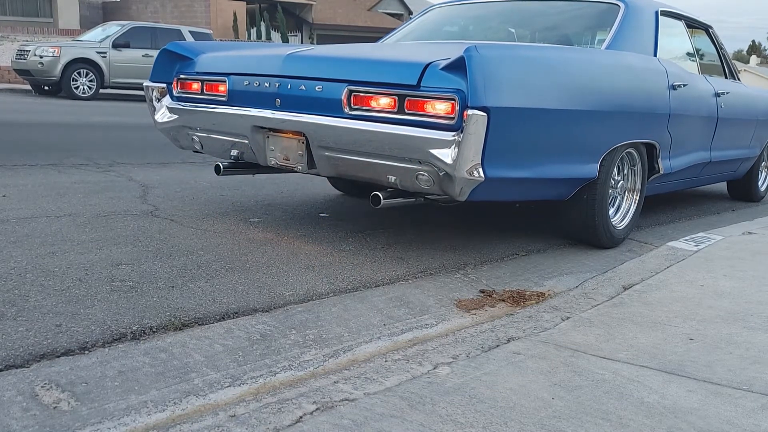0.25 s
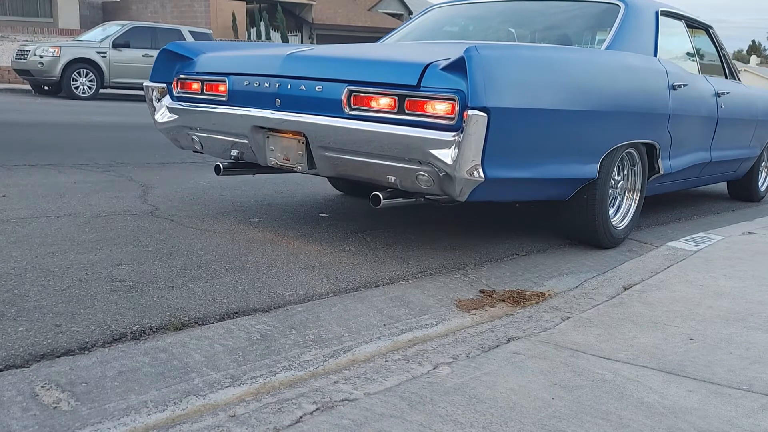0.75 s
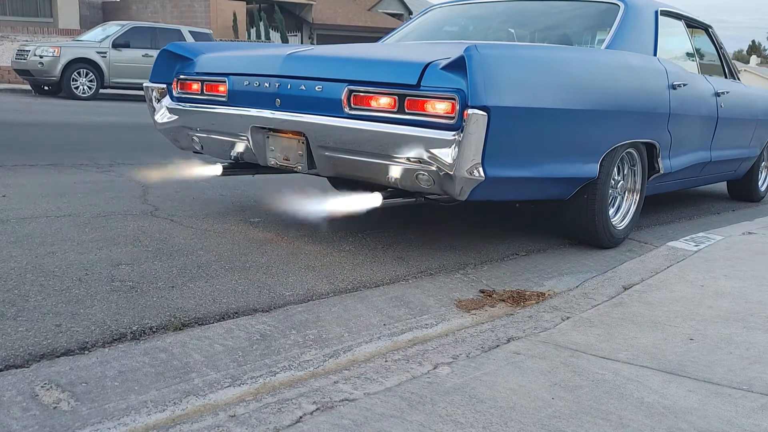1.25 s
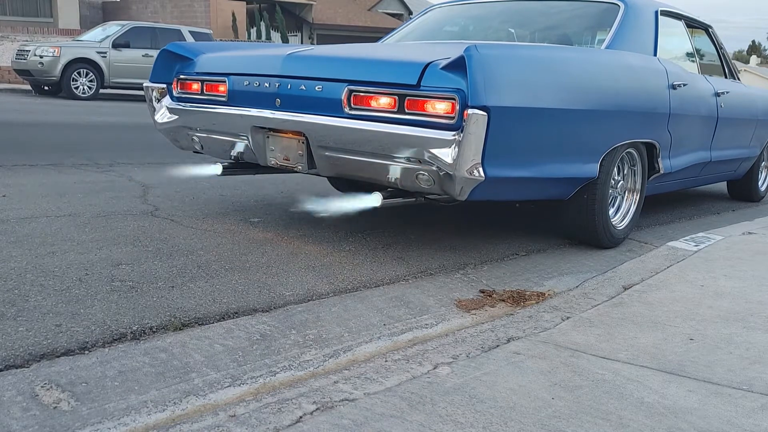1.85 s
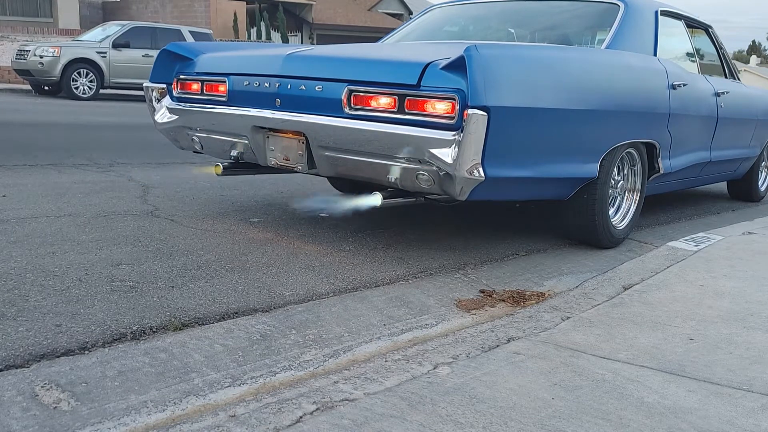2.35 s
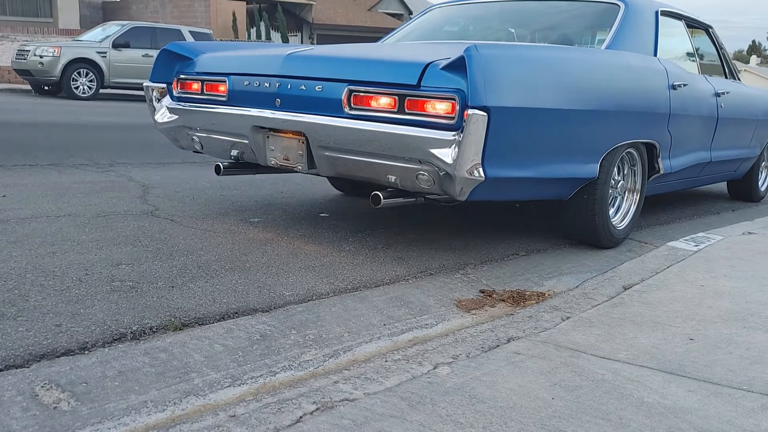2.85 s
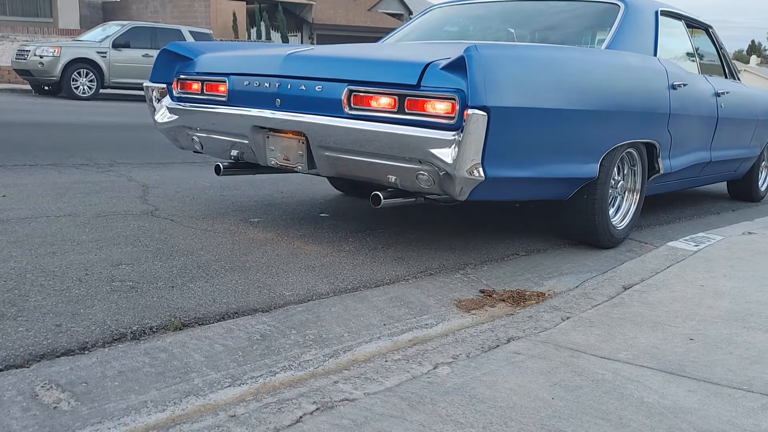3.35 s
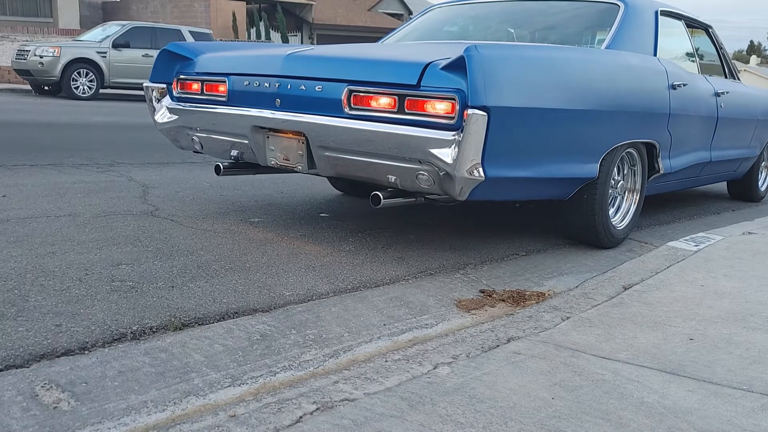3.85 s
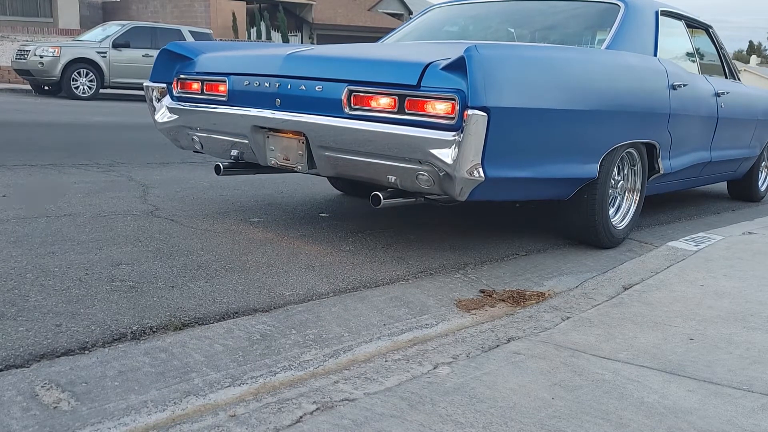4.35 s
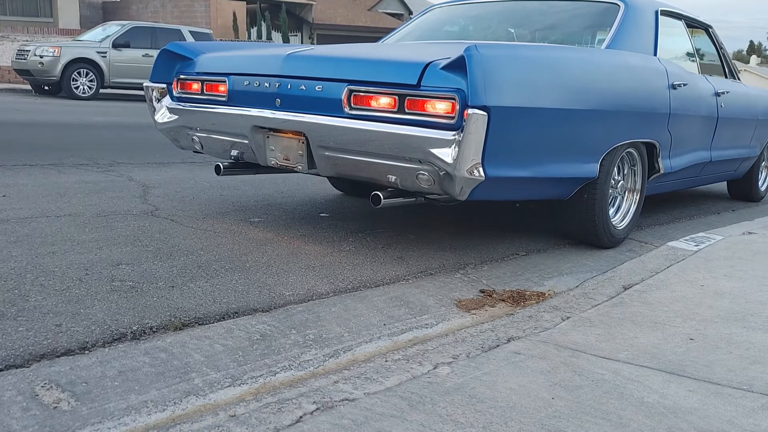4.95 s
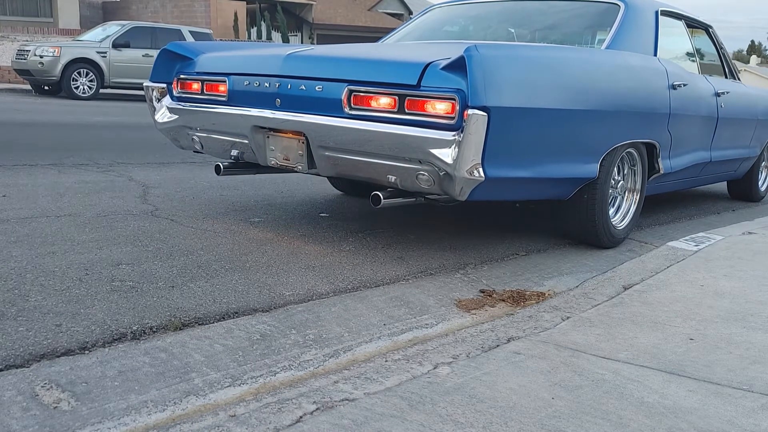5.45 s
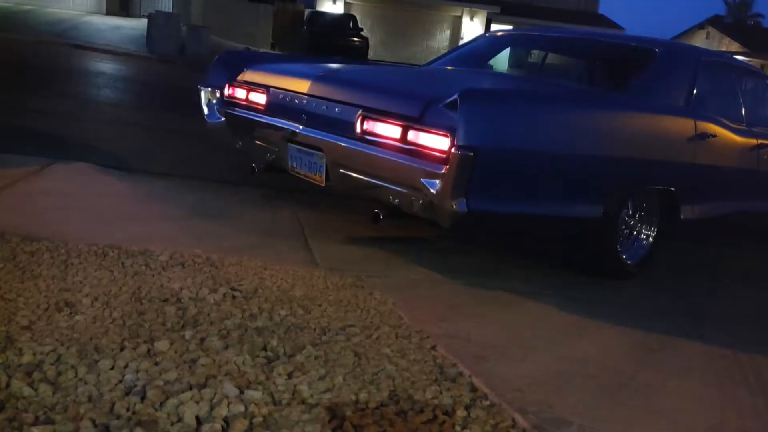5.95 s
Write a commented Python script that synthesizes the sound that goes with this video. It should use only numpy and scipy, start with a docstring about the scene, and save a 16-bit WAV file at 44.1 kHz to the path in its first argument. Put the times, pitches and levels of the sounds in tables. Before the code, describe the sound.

A V8 car engine runs throughout, thumping deeply and unevenly through open twin tailpipes about two metres from a low microphone on a quiet street. In the first second it gives four quick throttle stabs, each with a bark and a hissing rasp. From about 1.1 to 2.9 seconds the throttle is shut and fuel ignites in the pipes: a rapid, irregular string of pops and thuds over a low flame roar. Short revs return between 2.9 and 3.5 seconds. After a brief lull, a longer, crackling rev starts at 3.9, followed by two blips up to 4.7. The engine settles to a throbbing note, then is stabbed again at 5.2 and 5.5. At 5.6 the sound drops out for a tenth of a second, returning with a small blip and a final rev around 6. Faint valve ticking, slight wind and a short dull echo lie underneath.

```python
"""A V8 with open twin tailpipes, blipped at the kerb of a quiet street, two metres from a phone held low.
Uneven firings thump through the pipes and the escaping gas rasps when the throttle opens; on the overrun
unburnt fuel pops in flames. Behind that, loose tappets tick, the house fronts return a short dull tail
and a light wind touches the microphones. Near the end the sound drops out briefly and fades back in."""
import sys
import numpy as np
from scipy import signal
from scipy.fft import rfft, irfft
from scipy.io import wavfile

SR = 44100
rng = np.random.default_rng(int(sys.argv[2]) if len(sys.argv) > 2 else 0)


def master(y):
    """Save y as 16-bit WAV."""
    cut = np.clip(np.atleast_2d(y).T, -1, 1)
    pcm = np.round(cut * 32767)  # scale
    wavfile.write(sys.argv[1], SR, pcm.astype(np.int16))


N = 273420
TIME = np.arange(N) / SR

# Engine speed. Each row: time in seconds, firing rate in Hz, level of the firing note in dB.
ENGINE_SPEED = [(0.0, 112.5, -20), (0.171, 97.4, -30), (0.302, 117.8, -32), (0.399, 104.7, -28),
                (0.522, 126.7, -23), (0.7, 119.5, -27), (0.85, 112, -36), (1.05, 101.9, -32),
                (1.301, 127.2, -44), (1.86, 91.6, -17), (2.43, 74.84, -26), (2.68, 78.14, -42),
                (2.93, 104.9, -26), (3.03, 119.9, -11), (3.201, 100, -40), (3.321, 120.5, -30),
                (3.6, 105, -36), (3.75, 92.37, -11.5), (3.87, 68.47, -23), (4.06, 77.95, -25),
                (4.2, 125.5, -13), (4.3, 113, -17), (4.422, 125.7, -13), (4.548, 115, -15),
                (4.66, 127.9, -11.5), (4.85, 106.2, -9), (5.03, 86.05, -14), (5.19, 69.94, -30),
                (5.36, 117.9, -26), (5.461, 95.5, -9.5), (5.6, 115, -7), (5.751, 114.4, -14.5),
                (5.931, 82.02, -15), (6.2, 118, -30)]
# Strength in dB of each of the eight cylinders: the banks share the two pipes unevenly.
CYLINDER_DB = [-0.5, 1, 1.5, -5, -3.5, -2.5, -4.5, -2.5]
# Stabs of the throttle. Each row: start, hold and decay in seconds, opening from 0 to 1,
# extra thump, rasp and sizzle in dB.
THROTTLE_BLIPS = [(0.0, .1, 0.046, 0.66, -4.5, 2.5, 2.5), (0.14, 0.15, 0.066, 0.99, -0.5, 2.5, 3),
                  (0.399, 0.095, 0.058, 1, -4, 3, 3.5), (0.635, 0.22, 0.15, 0.97, -3.5, 5, 8.5),
                  (2.939, 0.11, 0.042, 0.8, 2, -2, -4), (3.1, 0.069, 0.049, 0.62, -4, 1, 0),
                  (3.19, 0.094, 0.075, 0.96, 1.5, 0, -2.5), (3.448, 0.0078, 0.055, 0.78, 0.5, 6.5, -8),
                  (3.871, .3, 0.19, 0.87, 1.5, 0, -1.5), (4.28, 0.13, 0.032, 0.96, 0.5, 2, 3),
                  (4.553, 0.079, 0.051, 0.93, 2, 0, 1.5), (5.197, .13, 0.077, 1, 4, 0, 1),
                  (5.459, 0.12, 0.044, 0.98, 0.5, -1.5, 0), (5.749, 0.057, 0.049, 0.51, -1.5, 5, -3),
                  (5.945, 0.31, 0.041, 0.98, 1, 3, 4)]
# Unburnt fuel burning in the pipes. Each row: time in seconds, richness from 0 to 1.
FLAME_RICHNESS = [(0.0, 0.06), (0.6, 0.57), (0.95, 0.67), (1.08, 0.73), (1.13, 1.0), (1.33, 0.9),
                  (1.45, 0.75), (1.8, 0.81), (2.0, 0.58), (2.3, 0.58), (2.6, 0.59), (2.74, 0.84),
                  (2.93, 0.77), (3.15, 0.16), (3.45, 0.02), (4.45, 0.47), (4.8, 0.47), (5.4, 0.28),
                  (6.2, 0.39)]
# Throttle shut and open, flame lean and rich. Each lists, from bass to treble, the relative level
# in dB of six bands: boom, thump, bark, rasp, crack, sizzle.
SHUT_DB = [-24.5, -21, -41, -57.5, -53, -69]
OPEN_DB = [-17, -18.5, -18, -28, -28, -42]
LEAN_DB = [-51, -48.5, -45.5, -62, -66, -89]
RICH_DB = [-18, -13, -15.5, -27, -35.5, -44]
# Tone of the pipes and of the escaping gas. Each row: frequency in Hz, relative level in dB.
PIPE_SPECTRUM = [(18, -36), (30, -30.5), (88, -12), (113, -1), (145, -6), (199, -6), (226, -9), (300, -8),
                 (459, -10.5), (497, -10), (538, -11), (573, -11), (660, -15), (994, -26), (1300, -26.5),
                 (1690, -83), (2860, -120)]
GAS_SPECTRUM = [(530, -31), (900, -4), (1800, -6.5), (2240, -6), (3110, -10), (4330, -7), (5390, -10.5),
                (6080, -7.5), (7950, -17.5), (9090, -6.5), (14400, -9.5), (15900, -19.5), (16500, -58)]
# The gas at the microphones. For rasp, crack and sizzle: left-right correlation; left minus right in dB.
GAS_CORRELATION = [0.6, 0.19, -0.021]
GAS_PAN_DB = [-1, -1.5, 3]
# Fuel lighting in the tailpipes. Each row: time in seconds, rasp and thud in relative dB, ring in Hz.
FUEL_POPS = [(1.0697, -43, -3, 243), (1.096, -45, -8, 240), (1.119, -16.5, -2, 241.9),
             (1.1858, -13, -3, 240.8), (1.2045, -15.5, -3, 403), (1.2381, -14, 0, 525.1),
             (1.267, -21, -2.5, 542.2), (1.2898, -10.5, -5, 266), (1.3472, -18, -2.5, 238),
             (1.3715, -38, -12, 262), (1.4368, -23.5, -3, 275), (1.4645, -20.5, -20, 243.4),
             (1.495, -25, -6, 299), (1.5237, -15, -6, 366), (1.5612, -18.5, -1.5, 259.5),
             (1.627, -20.5, -2.5, 295.5), (1.6567, -16.5, -4, 244), (1.6846, -21, -2, 390),
             (1.7338, -12, -9, 547), (1.772, -15.5, -20, 250), (1.8153, -13, -6.5, 366),
             (1.8601, -23, -9, 446), (1.8945, -23, -8, 323), (1.932, -17, -2, 376),
             (1.9745, -23.5, -2.5, 407), (1.9944, -21, -15, 250), (2.0378, -30, -15, 273),
             (2.0705, -26, -4, 238), (2.0964, -19.5, -12, 325), (2.1777, -17.5, -2.5, 296.2),
             (2.214, -17, -13, 323), (2.2595, -23.5, -13, 424), (2.3082, -21, -11, 535),
             (2.3503, -15.5, -4.5, 440), (2.4029, -22, -9, 279.4), (2.4552, -25, -16, 362),
             (2.5096, -15.5, -7.5, 358.7), (2.6228, -8.5, -4, 303), (2.672, -22, -15, 344),
             (2.7082, -15.5, -4, 369), (2.7292, -14, -5, 255), (2.7565, -14, -5, 244.1),
             (2.7767, -42, -9, 293), (2.816, -9, -1.5, 436.5), (2.8338, -36.5, -4, 439.5),
             (2.85, -21, -8, 394), (2.8725, -11, -2, 436), (2.889, -17, -21, 430)]
# The hardest firings. Each row: time in seconds, rasp and thud in relative dB,
# crack in dB above the rasp, ring in Hz.
HARD_FIRINGS = [(0.046, -28, -12, 8.5, 241), (0.0869, -21.5, -29, 4.5, 390),
                (0.1394, -25.5, -17, 13.5, 245), (0.1486, -14, -10, -12, 291), (0.1834, -5, -35, -9, 452),
                (0.2325, -5, -4, -4, 507), (0.3027, -48, -12, -9, 320), (0.401, -10, -4, -12.5, 244),
                (0.4152, -28, -8, 3, 286), (0.4433, -5.5, -7, -4.5, 242), (0.4776, -21, -2.5, 0, 224),
                (0.496, -24, -9, -15, 455), (0.635, -18.5, -32, 4, 312), (0.6948, -10.5, -3, -3.5, 253),
                (0.7475, -12.5, -13, -2, 396), (0.8075, -22, -37, -3, 372), (0.8223, -7.5, -5, -13, 240),
                (0.865, -19, -10, 5, 315), (2.9372, -12, -18, -22, 273.8), (2.9672, -8, -6, -15, 455),
                (3.0105, -7, -36, -7, 320), (3.032, -15, -9, 3, 372.7), (3.0438, -12, -7, -13, 377),
                (3.102, -27.5, -20, 10, 260), (3.1544, -23, -14, 5, 285), (3.1925, -12, -9, 1.5, 258),
                (3.2197, -8, -10, -3, 390), (3.2495, -24.5, -18, 6, 242), (3.2813, -26, -24, -3, 250.6),
                (3.3748, -23.5, -28, -6, 298.5), (3.4499, -15, -6.5, -0.5, 304),
                (3.7717, -28.5, -43, 1.5, 275), (3.8198, -26.5, -25, -8, 265), (3.8847, -9.5, -7, 3.5, 420),
                (3.905, -15, -10, -7, 242), (3.9175, -15, -23, -3, 263), (3.931, -8, -11, 2, 304),
                (3.9474, -24, -15, 6, 302), (3.9604, -21, -12, 12.5, 278), (3.9908, -12, -18, 1.5, 429.7),
                (4.0045, -27, -13, 13, 240), (4.0192, -31, -15, 2, 282), (4.0453, -11.5, -11.5, 2, 253),
                (4.0609, -11.5, -13, -1, 345), (4.0885, -14, -16, 5, 328.3), (4.0987, -13, -10, 2, 484),
                (4.11, -13, -17, -2, 256), (4.131, -11.5, -12, -6, 273.8), (4.1436, -12, -6, -1.5, 382),
                (4.1952, -16.5, -27, 5, 245.8), (4.2785, -25, -12, 4, 248.7), (4.3092, -11, -28, -13, 260),
                (4.3541, -14.5, -14, 1, 317), (4.4208, -17, -15, -4, 285), (4.5552, -13, -11, -12, 303),
                (4.581, -16, -8, 2, 322.7), (4.6371, -11.5, -17, -5, 250.6),
                (5.1991, -16.5, -10.5, -3, 312), (5.2248, -18.5, -10, 11, 472.6),
                (5.2375, -9.5, -23, 0.5, 325.6), (5.3141, -17.5, -22, 1, 253.1),
                (5.3773, -24.5, -18, -2, 244), (5.464, -29, -21, 8, 246.2), (5.4838, -9, -8, 0, 302),
                (5.5595, -24, -5, 0, 320.4), (5.7507, -26.5, -18, -14, 304), (5.7866, -15.5, -7, -9.5, 285),
                (5.9437, -16.5, -13.5, -18, 242), (5.9526, -30, -7, -4, 292), (5.9704, -20, -16, -1, 240.1),
                (5.9817, -40, -15.5, 2, 277.8), (5.9984, -23, -10, 1, 280), (6.0244, -15, -17, 0, 242),
                (6.0376, -30, -5.5, -3, 270), (6.0593, -28, -8, 1, 404), (6.0814, -13, -7, -7, 415.4),
                (6.0955, -22, -10, -3, 319.4)]
# Ring of the valve gear. Each row: frequency in Hz, relative level in dB, seconds to fall by 60 dB.
VALVE_MODES = [(2640, -1.5, 0.031), (4030, 1.5, .015), (6549, 4, 0.016)]
# Overall level, with a brief dropout near the end. Each row: time in seconds, gain in dB.
OVERALL_GAIN = [(5.595, -11), (5.608, -19), (5.61, -26), (5.63, -56), (5.67, -91), (5.685, -28), (5.7, -16),
                (5.72, -9)]

BOOM_TOP_HZ, THUMP_TOP_HZ, BARK_TOP_HZ, RASP_TOP_HZ, CRACK_TOP_HZ = 138, 375, 1050, 3300, 7800


def firings(rate_hz, jitter_s, scatter_db):
    """The cylinders fire in turn, each a little off: times, strengths in dB and the running cycle count."""
    cycles = np.cumsum(rate_hz) / SR
    count = np.arange(int(cycles[-1]))
    timing, strength = rng.standard_normal((len(count), 2)).T
    firing_s = np.interp(count, cycles, TIME) + jitter_s * timing
    firing_db = np.array(CYLINDER_DB)[count % 8] + scatter_db * strength
    return firing_s, np.minimum(firing_db, 2.5), cycles


def throttle_and_flame():
    """Six band levels in dB: the throttle moves them from shut to open, the flame adds its own roar."""
    opening, extra_db = np.zeros(N), np.zeros((6, N))
    for start, hold, decay, size, thump, rasp, sizzle in THROTTLE_BLIPS:
        age = np.maximum(TIME - start, 0)
        attack = (TIME >= start) * (1 - 0.04 * np.exp(-age / .03))  # nearly all of it comes at once
        blip = attack * np.exp(-np.maximum(age - hold, 0) / decay)
        opening = np.maximum(opening, size * blip)
        extra_db += np.outer([thump, thump, 0, rasp, 0, sizzle], blip)
    engine_db = blend(SHUT_DB, OPEN_DB, opening) + extra_db
    flame_db = blend(LEAN_DB, RICH_DB, curve(FLAME_RICHNESS))
    return 10 * np.log10(undb(2 * engine_db) + undb(2 * flame_db))  # the powers add


def tailpipes(firing_s, firing_db, boom_db, thump_db, bark_db, brightness_db):
    """Each firing is a pressure pulse with turbulent flow behind it, more with an open throttle."""
    pulses = impulses(firing_s, undb(firing_db))
    flow = unit(fade(pulses, 0.0073) * rng.standard_normal(N))
    exhaust = np.clip((brightness_db + 40) / 18, .4, .9) * flow + unit(pulses)
    boom = unit(colour(flow, PIPE_SPECTRUM, 15, BOOM_TOP_HZ))
    thump = unit(colour(exhaust, PIPE_SPECTRUM, BOOM_TOP_HZ, THUMP_TOP_HZ))
    bark = unit(colour(exhaust, PIPE_SPECTRUM, THUMP_TOP_HZ, BARK_TOP_HZ))
    return undb(boom_db + 9.5) * boom + undb(thump_db + 8.5) * thump + undb(bark_db + 9.5) * bark


def bangs(pop_crack_db=-18.5):
    """Fuel pops and hard firings together; the dull ones are flames, which linger."""
    pops = np.insert(FUEL_POPS, 3, pop_crack_db, axis=1)
    bang_s, rasp_db, thud_db, crack_above_db, ring_hz = np.vstack([pops, HARD_FIRINGS]).T
    linger = np.clip(-crack_above_db / 14, 0, 1)
    return bang_s, rasp_db, rasp_db + crack_above_db, thud_db, ring_hz, linger


def escaping_gas(firing_s, firing_db, band_db, brightness_db):
    """Rasp, crack and sizzle at the pipe mouths: in bursts with the throttle open, steadier when shut."""
    bang_s, rasp_db, crack_db, _, _, linger = bangs()
    sizzle_db = crack_db + np.interp(bang_s, TIME, band_db[2] - band_db[1])
    bang_db = [rasp_db - 4.5, crack_db + 1.5, sizzle_db + 4.5]
    burstiness = np.clip((brightness_db + 35) / 16, .25, 1)
    tint_db = 4.6 * rng.standard_normal((len(firing_s), 3)).T  # every burst has its own colour
    edges_hz = [BARK_TOP_HZ, RASP_TOP_HZ, CRACK_TOP_HZ, .45 * SR]
    left_right = np.array([[1], [-1]])
    out = np.zeros((2, N))
    for k, trim_db in enumerate([2.5, 4.0, 6.0]):
        bursts = unit(puff(impulses(firing_s, undb(0.26 * firing_db + tint_db[k])), 0.0019))
        flow = burstiness * bursts + 1 - 0.48 * burstiness
        shots = puff(impulses(bang_s, undb(bang_db[k])), 0.0012)
        flames = puff(impulses(bang_s, undb(bang_db[k]) * linger), 0.0038)
        envelope = undb(band_db[k] + trim_db) * flow + shots + .5 * flames
        noises = rng.standard_normal((2, N))
        band = GAS_SPECTRUM, edges_hz[k], edges_hz[k + 1]
        noise_rms = np.std(colour(noises[0], *band))
        mid, side = (colour(envelope * noise, *band) / noise_rms for noise in noises)
        pair = mid * np.sqrt(1 + GAS_CORRELATION[k]) + side * np.sqrt(1 - GAS_CORRELATION[k]) * left_right
        out += pair * undb(GAS_PAN_DB[k] / 2 * left_right)
    return out


def thuds(crest_db=10, burn_db=-11):
    """Each bang rings the gas column for a few cycles; flames leave a short roar of burning gas."""
    bang_s, _, _, thud_db, ring_hz, linger = bangs()
    peaks = undb(thud_db + crest_db)
    t = np.arange(2048) / SR
    rings = np.zeros(N + len(t))
    for at, peak, hz in zip(bang_s, peaks, ring_hz):
        ring = np.sin(2 * np.pi * hz * t) * (hz * t) ** 0.84 * np.exp(-hz * t / 0.78)
        start = int(max(at - 0.35 / hz, 0) * SR)
        rings[start:start + len(t)] += peak * ring / np.abs(ring).max()
    burn = puff(impulses(bang_s, peaks * undb(burn_db) * linger), 0.0046)
    roar = unit(colour(rng.standard_normal(N), PIPE_SPECTRUM, 220, BARK_TOP_HZ))
    return rings[:N] + burn * roar


def tappets(firing_s, level_db=-33.5, scatter_db=7):
    """Two loose tappets tick once in every round of the eight cylinders, over the rustle of the rest."""
    tick_s = np.sort(np.append(firing_s[3::8], firing_s[5::8]))
    ticks = impulses(tick_s, undb(level_db + scatter_db * rng.standard_normal(len(tick_s))))
    clatter = (fade(ticks, 0.00094) + undb(level_db - 14)) * rng.standard_normal((2, N))
    t = np.arange(2048) / SR
    ring = sum(undb(db - 60 * t / t60) * np.sin(2 * np.pi * hz * t) for hz, db, t60 in VALVE_MODES)
    return signal.fftconvolve(clatter, ring[None] / np.sqrt(np.sum(ring ** 2)), axes=1)[:, :N]


def street(x, t60_s, band_hz):
    """Asphalt, kerb and house fronts scatter a short dull tail, different on each side."""
    t = np.arange(SR // 4) / SR
    tail = rng.standard_normal((2, len(t))) * undb(-60 * t / t60_s)
    tail = signal.sosfilt(bandpass(*band_hz), tail)
    return signal.fftconvolve(x[None], tail / np.sqrt(np.sum(tail ** 2) / 2), axes=1)[:, :N]


def breeze():
    """A light wind buffets each microphone port on its own."""
    return undb(-48) * unit(signal.sosfilt(bandpass(20, 70), rng.standard_normal((2, N))))


def undb(db):
    """Decibels to amplitude."""
    return 10 ** (np.asarray(db) / 20)


def unit(x):
    """Scale to rms 1."""
    return x / np.sqrt(np.mean(x ** 2))


def curve(points):
    """Join rows of time and value with straight lines."""
    return np.interp(TIME, *np.transpose(points))


def blend(from_db, to_db, share):
    """Move each band between two levels as the share goes from 0 to 1."""
    return np.array(from_db)[:, None] + np.subtract(to_db, from_db)[:, None] * share


def bandpass(lo_hz, hi_hz):
    """A band filter with gentle slopes."""
    return signal.butter(2, [lo_hz, hi_hz], "band", fs=SR, output="sos")


def colour(x, spectrum, lo_hz, hi_hz):
    """Causal filter with the given spectrum; one band is then taken without delay, so bands add up."""
    hz, db = np.transpose(spectrum)
    grid_hz = np.linspace(1, SR / 2, 4097)
    cepstrum = irfft(np.log(undb(np.interp(np.log(grid_hz), np.log(hz), db))))
    cepstrum[1:4096] *= 2  # fold to minimum phase
    cepstrum[4097:] = 0
    response = irfft(np.exp(rfft(cepstrum)))[:4096]
    return signal.sosfiltfilt(bandpass(lo_hz, hi_hz), signal.fftconvolve(x, response)[:N])


def impulses(seconds, size):
    """Impulses of the given sizes at the given times."""
    x = np.zeros(N)
    np.add.at(x, np.clip((seconds * SR).astype(int), 0, N - 1), size)
    return x


def fade(x, seconds):
    """Every impulse becomes a sudden rise with an exponential fall."""
    return signal.lfilter([1], [1, -np.exp(-1 / (seconds * SR))], x)


def puff(x, seconds):
    """Every impulse becomes a rounded swell and a slower fall, peak near 1."""
    return fade(fade(x, seconds), 0.69 * seconds) * 3.79 / (seconds * SR)


def scene():
    """The car from two metres, with the street and the breeze around it; all of it drops out briefly."""
    crank_s, rate_hz, note_db = np.transpose(ENGINE_SPEED)
    rate_hz, note_db = np.interp(TIME, crank_s, rate_hz), np.interp(TIME, crank_s, note_db)
    firing_s, firing_db, cycles = firings(rate_hz, jitter_s=0.00117, scatter_db=6.0)
    note = np.sqrt(2) * undb(note_db) * np.sin(2 * np.pi * (cycles + 0.054))
    boom_db, thump_db, bark_db, rasp_db, crack_db, sizzle_db = throttle_and_flame()
    boom_db -= .7 * np.maximum(note_db + 20, 0)  # even firing gathers the boom into one note
    low = tailpipes(firing_s, firing_db, boom_db, thump_db, bark_db, rasp_db - thump_db) + note + thuds()
    high = escaping_gas(firing_s, firing_db, [rasp_db, crack_db, sizzle_db], crack_db - thump_db)
    tail = undb(-21) * street(low, t60_s=.2, band_hz=(120, 1100))
    tail += undb(-14) * street(high.mean(axis=0), t60_s=0.082, band_hz=(680, 2950))
    return (low + high + tail + tappets(firing_s) + breeze()) * undb(curve(OVERALL_GAIN))


def record(dry):
    """The phone drops the deepest bass, flattens the peaks under a ceiling and cuts the top."""
    bottom_hz, top_hz, ceiling = 30, 15900, .9
    firm = signal.sosfilt(signal.butter(2, bottom_hz, "high", fs=SR, output="sos"), dry)
    capped = firm / (1 + (firm / ceiling) ** 4) ** (1 / 4)
    return signal.sosfilt(signal.ellip(8, .2, 70, top_hz, fs=SR, output="sos"), capped)


dry = scene()
out = record(dry)
master(out)
```